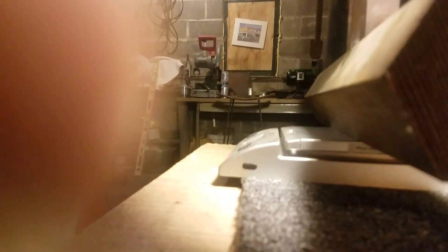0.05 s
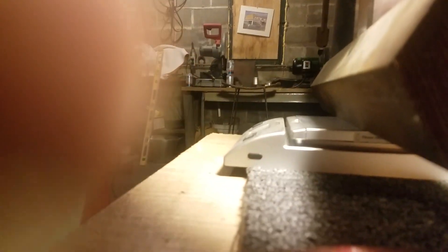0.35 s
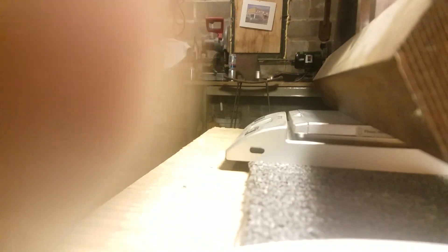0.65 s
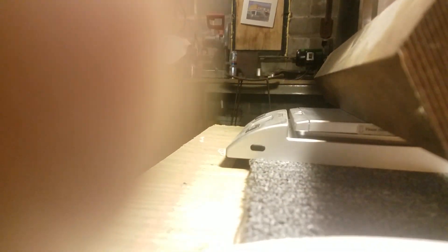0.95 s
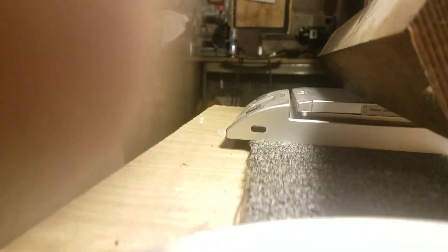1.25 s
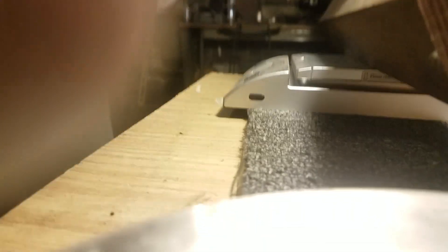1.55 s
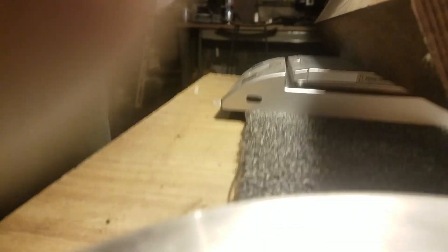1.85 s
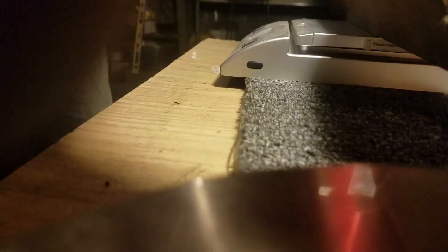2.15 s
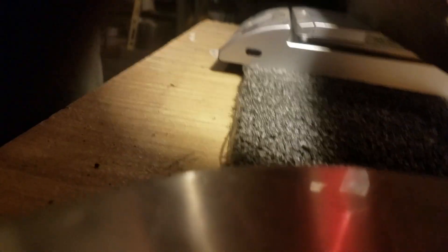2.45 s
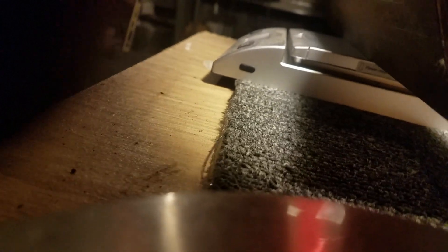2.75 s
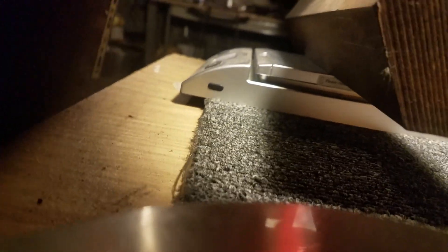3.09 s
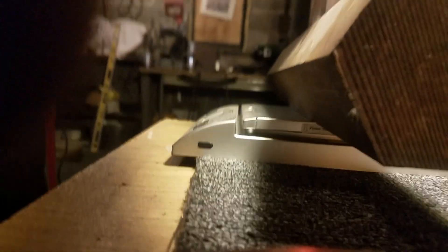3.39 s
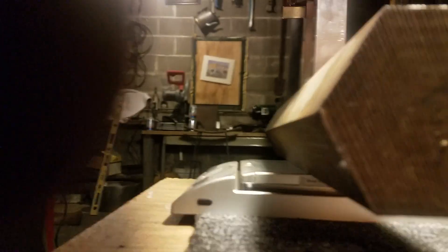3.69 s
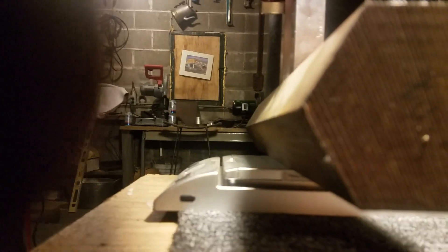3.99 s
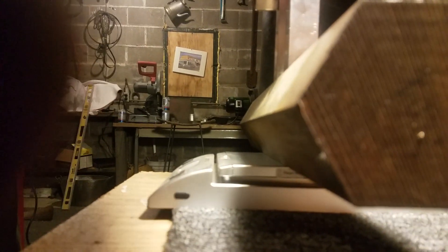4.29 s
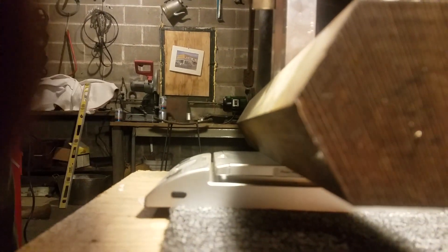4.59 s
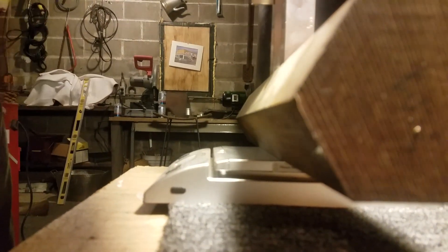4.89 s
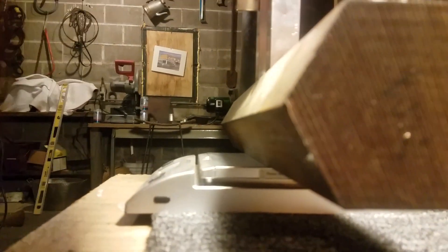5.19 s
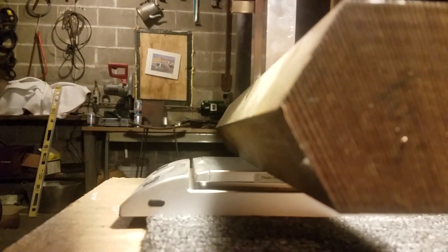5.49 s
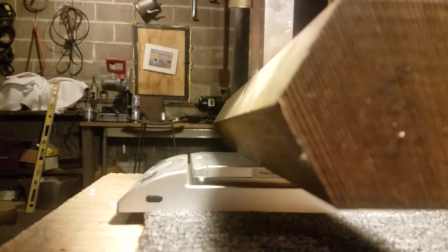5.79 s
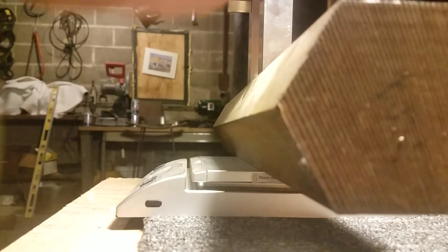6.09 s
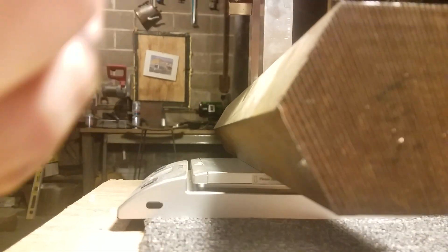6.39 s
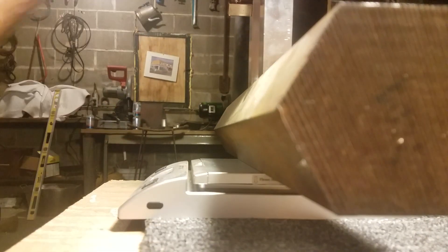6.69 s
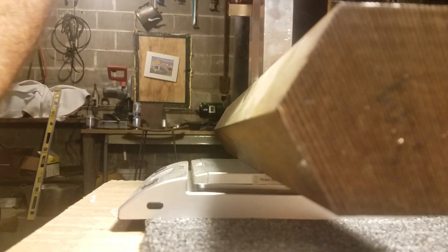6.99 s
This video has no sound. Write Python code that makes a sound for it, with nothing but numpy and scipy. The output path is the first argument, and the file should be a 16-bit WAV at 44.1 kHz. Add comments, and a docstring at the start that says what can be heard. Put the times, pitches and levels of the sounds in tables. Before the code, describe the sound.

A phone is handled in a quiet workshop, heard right at its own microphones, clear on the left and dull on the right. Light fingertip rubbing and a low, lumpy rumble run from the start, with small knocks around 0.6 and 1.1 seconds. From 1.3 to 2.2 seconds the gripping skin creaks and gives sharp ticks, followed by soft thumps. Short wavering squeaks come at about 2.4, 2.7 and 3.2 seconds. Heavier scraping with clicks and bumps fills 3.4 to 4.2 seconds. At about 4.8 seconds the case lands on a workbench in a quick cluster of knocks, the loudest moment, and the bench rings briefly. A lull with faint taps follows. From 5.6 seconds fingers brush the phone again, with a sharp click at 6 seconds and light taps until the end at about 7. Still air and a faint low drone lie underneath.

```python
"""A quiet workshop, heard through a phone's own two microphones as it is handled and propped on a bench.
A fingertip rubs right beside the left port; where the skin grips it sticks and slips, in ticks,
creaks and short squeaks. The grip flexes the case with a low rumble. The case knocks on the bench,
which rings, and the fingers brush it again. The right microphone hears the handling dully, through
the body. Behind it all lie still air and a faint low drone."""
import sys
import numpy as np
from scipy import signal
from scipy.fft import rfft, irfft, next_fast_len
from scipy.io import wavfile

SR = 44100
rng = np.random.default_rng(int(sys.argv[2]) if len(sys.argv) > 2 else 0)


def to_wav(s):
    """Save 16-bit WAV."""
    ch = np.atleast_2d(s).T  # columns
    pcm = np.round(np.clip(ch, -1, 1) * 32767)  # PCM
    wavfile.write(sys.argv[1], SR, pcm.astype(np.int16))


N = 310905

# What a slip rings with at the near (left) port and, through the body, at the far (right) one.
# Each row: nominal frequency in Hz, width in Hz, relative level in dB.
NEAR_MODES = [(750, 650, -11.5), (1540, 380, 0), (2380, 876, 0), (3300, 502, 2.5), (4080, 550, -0.5),
              (6510, 960, -3.5), (7640, 2300, -6.5), (11610, 940, -8.5), (15000, 2600, -8)]
FAR_MODES = [(680, 770, 15), (1600, 94, -2.5), (2130, 510, -10.5), (4250, 2900, 4)]
# How firmly the hand holds the case, slackest just after it lands on the bench.
# Each row: time in seconds, then skin creep, left rumble and right rumble in dB.
GRIP = [(0, -58.5, -59, -65), (.47, -68, -57, -64), (.6, -61, -48, -65), (1.0, -62.5, -53.5, -61),
        (1.15, -59, -42.5, -59), (1.48, -59, -49, -61.5), (2.03, -48, -48, -66), (2.14, -62, -53, -61),
        (2.6, -56.5, -47, -65), (3.02, -62.5, -52.5, -59), (3.38, -62, -51, -66.5),
        (3.52, -49.5, -43.5, -49.5), (3.97, -62, -52, -60.5), (4.32, -63.5, -56.5, -61),
        (4.7, -68, -62, -64.5), (4.85, -54, -52.5, -54.5), (5.17, -72, -74, -83), (5.57, -69.5, -64, -71.5),
        (5.76, -68, -56.5, -57.5), (6.1, -57, -50.5, -62), (6.52, -59.5, -63.5, -66), (7.05, -53, -53, -57)]


def from_db(db):
    """Decibels to gain."""
    return 10 ** (np.asarray(db) / 20)


def rms_one(x):
    """Scale to an rms of 1."""
    return x / np.sqrt(np.mean(x ** 2) + 1e-20)


def in_time(rows):
    """Each column of a curve at every sample."""
    s, *columns = np.transpose(sorted(rows))
    return [np.interp(np.arange(N) / SR, s, c) for c in columns]


def add(track, s, sound):
    """Mix a sound in at s seconds."""
    at = int(round(s * SR))
    track[at:at + len(sound)] += sound[:N - at]


def drift(hz):
    """Slow random wander of spread 1."""
    r = np.exp(-2 * np.pi * hz / SR)
    return rms_one(signal.lfilter([1], [1, -2 * r, r * r], rng.standard_normal(N + SR))[SR:])


def coloured(x, colour):
    """Give a steady excitation a spectrum that falls away beyond its end points; rms 1."""
    hz, db = np.transpose(colour)
    size = next_fast_len(N)
    log_hz = np.log(np.maximum(np.fft.rfftfreq(size, 1 / SR), 1))
    beyond = np.abs(log_hz - np.clip(log_hz, np.log(hz[0]), np.log(hz[-1])))
    gain = from_db(np.interp(log_hz, np.log(hz), db) - 30 * beyond)
    return rms_one(irfft(rfft(x, size) * gain, size)[:N])


def resonate(x, hz, width_hz):
    """A resonance with gain 1 at its peak."""
    r = np.exp(-np.pi * width_hz / SR)
    poles = [1, -2 * r * np.cos(2 * np.pi * hz / SR), r * r]
    return signal.lfilter(np.array([1, 0, -1]) * (1 - r * r) / 2, poles, x)


def gesture(s, length, attack_s, release_s, swell_db=0.0, arch_db=0.0):
    """Rise, hold with a swell and an arch, then die away; gain at every sample."""
    out = np.zeros(N)
    t = np.arange(int((length + 8 * release_s) * SR)) / SR
    along = np.minimum(t / length, 1) - .5
    hold = from_db(swell_db * along + arch_db * (np.cos(np.pi * along) - 2 / np.pi))
    add(out, s, hold * np.minimum(t / attack_s, 1) * np.exp(-np.maximum(t - length, 0) / release_s))
    return out


def room_tone(air_db=-69.5, drone_db=-72.5):
    """Still air, separate at each microphone, and a faint low drone common to both."""
    # Spectrum of the air. Each row: frequency in Hz, relative level in dB.
    air_colour = [(15, -20.5), (25, 0), (92, 0.5), (190, -8.5), (309, -5.5), (591, -31), (863, -24.5),
                  (1040, -30.5), (1290, -22), (2220, -19.5), (5880, -31.5), (14800, -30.5), (16000, -41.5)]
    air = np.array([coloured(rng.standard_normal(N), air_colour) for side in range(2)])
    drone = rms_one(resonate(rng.standard_normal(N), hz=312, width_hz=24))
    return from_db(air_db) * air + from_db(drone_db) * drone


def workshop_tail(x, t60=0.27, wet_db=-50.0, wall_hz=3500):
    """The room returns a faint dull tail."""
    t = np.arange(SR // 2) / SR
    walls = signal.butter(2, wall_hz, fs=SR, output="sos")
    tails = signal.sosfilt(walls, rng.standard_normal((2, len(t)))) * from_db(-60 * t / t60)
    tails /= np.sqrt(np.sum(tails ** 2, axis=1, keepdims=True))
    return from_db(wet_db) * signal.fftconvolve(x.sum(axis=0)[None], tails, axes=1)[:, :N]


def grip_rumble(opposed=0.043, lumps_db=3.5):
    """The grip flexes the case in lumps, pushing the two microphones partly in opposite senses."""
    # Shifts of the grip. Each row: start and length in seconds, left and right level in dB.
    bumps = [(0.077, 0.016, -45.5, -55), (0.227, 0.027, -47.5, -60), (0.3, 0.019, -54, -49.5),
             (.58, 0.011, -43.5, -56), (0.775, .025, -43, -62), (.945, 0.018, -39, -65),
             (1.964, 0.029, -36.5, -62), (2.198, .035, -34.5, -41), (3.438, .035, -43, -57),
             (3.532, 0.023, -41, -40), (3.929, .02, -45, -48), (4.148, 0.017, -45, -42),
             (4.764, 0.045, -34, -34.5), (4.93, 0.018, -51, -49), (5.044, 0.011, -48, -56),
             (5.236, 0.015, -54.5, -76), (5.666, 0.014, -39, -43), (5.843, 0.028, -43, -46.5),
             (5.986, 0.024, -38.5, -46), (6.166, 0.021, -39.5, -49), (6.226, .015, -50, -53),
             (6.571, 0.02, -43, -52), (6.815, 0.062, -46, -52)]
    # Spectrum of the flexing case. Each row: frequency in Hz, relative level in dB.
    rumble_colour = [(20, -11), (50, 0), (110, -1.5), (200, -6.5), (330, -16), (600, -25)]
    flex = from_db(in_time(GRIP)[1:]) * from_db(lumps_db * drift(hz=7.1))
    for s, length, *sides_db in bumps:
        bump = gesture(s, length, attack_s=0.0042, release_s=0.015)   # gives at once, then settles
        flex = np.maximum(flex, np.outer(from_db(sides_db), bump))
    left, right = (coloured(rng.standard_normal(N), rumble_colour) for side in range(2))
    return flex * np.array([left, rms_one(right - opposed * left)])


def friction(per_s, spread_db, smooth):
    """Skin ridges catch at random, with uneven force, over a smooth sliding hiss."""
    caught = rng.random(N) < per_s / SR
    force = from_db(spread_db * np.minimum(rng.exponential(1, N), 4)) * rng.choice([-1, 1], N)
    return rms_one(rms_one(caught * force) + smooth * rng.standard_normal(N))


def stroke_gains(lead_s=0.0053):
    """Gains of rub, bright rub, scuff, hiss and far port: strokes over the holding hand's faint creep."""
    # Strokes of skin past the port. Each row: start and length in seconds, then in dB the rub level,
    # its swell from start to end, brightness, scuff and hiss relative to the rub, and far port level.
    strokes = [(0.087, 0.011, -71, -3, 4, 2, -10, -52.5), (0.231, 0.011, -35, -4, 4.5, 0, -2.5, -68),
               (0.309, 0.013, -60.5, 1, 11, -1, -6, -48), (0.339, 0.11, -55, 1.5, 6, 0, -3, -68),
               (0.488, 0.053, -50, -10.5, 1, 1, -4.5, -73),
               (0.576, 0.066, -50.5, -19, 4.5, -4.5, -5.5, -67),
               (0.645, 0.074, -48.5, -5, 4.5, -7.5, -2.5, -70),
               (0.739, 0.056, -53.5, 11.5, 4.5, 0, -2, -68), (0.925, 0.027, -48.5, 16, 2.5, 1.5, -4, -66),
               (1.051, 0.08, -59, 0, -8, 8.5, -8, -72), (1.143, 0.077, -46, 3.5, 3.5, 0.5, -3.5, -67),
               (1.242, 0.11, -48, 4, -3.5, -3.5, -10, -57), (1.508, 0.18, -60.5, -5, 1, 7.5, -1.5, -71),
               (1.685, 0.16, -48, 5, 3, 0, -3.5, -62), (1.914, 0.092, -50.5, 15, 3, -2, -3.5, -78),
               (2.046, 0.061, -49.5, -5, -5, 2, -7, -62), (2.195, 0.083, -41, -8.5, 7, 1, -4.5, -42.5),
               (2.372, 0.23, -43, 4, 7, -6.5, -8, -52.5), (2.662, 0.15, -42, -4, 0, -8, -9, -54),
               (2.821, 0.084, -56, -4, -21, 5.5, 0, -54.5), (3.166, 0.15, -44, -13, 2, -11.5, -11.5, -60),
               (3.418, 0.13, -39, -15, 3.5, -2.5, -6.5, -45), (3.601, 0.17, -38.5, 2, 0, -2.5, -10.5, -47),
               (3.799, 0.14, -40.5, -2.5, 0, -7, -14.5, -53),
               (3.981, 0.188, -46.5, 0.5, 0.5, -0.5, -8, -61),
               (4.358, 0.043, -44, 2.5, 0.5, -0.5, -9.5, -66), (4.422, 0.086, -58.5, -4, 2, 2.5, -6, -55.5),
               (4.61, 0.064, -57, -4, 3, 5, -15, -60.5), (4.744, 0.044, -39, 5, 2, -1, -9, -40),
               (4.851, 0.11, -54, -16, 7, 3, -8, -57.5), (4.983, 0.153, -55.5, 4.5, 3, -7, -5, -74),
               (5.615, 0.033, -48, -1.5, 2.5, -3, -8, -74), (5.67, 0.097, -60, -8, 7, 0, -1.5, -66),
               (5.848, 0.075, -55, -10, 3, 3, -5.5, -65), (5.903, 0.11, -42.5, 4, 2, -2.5, -1, -58),
               (6.023, 0.16, -47.5, -5.5, -1.5, -5, -4, -65),
               (6.31, 0.17, -45.5, -9.5, -0.5, -1.5, -11, -73), (6.428, 0.042, -41, 9, -7, -3.5, -18, -71),
               (6.496, 0.026, -56.5, 4, 4, 1, -1, -74), (6.559, 0.039, -48, -11, 5.5, 0, -9.5, -65),
               (6.634, 0.085, -46, -8, 3.5, 0.5, -12.5, -64), (6.726, 0.075, -46, 3, 4, -0.5, -9.5, -67),
               (6.837, 0.031, -48.5, 2, 6.5, -2, -3.5, -62), (6.928, 0.093, -53, 6.5, 6, -1, -2.5, -72)]
    creep = from_db(in_time(GRIP)[0])
    power = np.outer(from_db([0, 0, 0, -4.5, -5]), creep) ** 2
    for s, length, db, swell_db, bright_db, scuff_db, hiss_db, far_db in strokes:
        # The skin gives just before it slides; the arch is the extra speed in mid-stroke.
        stroke = gesture(s - lead_s, length + lead_s, attack_s=0.0089, release_s=0.0084,
                         swell_db=swell_db, arch_db=0.5)
        on = np.flatnonzero(stroke)
        gains = from_db([db, db + bright_db, db + scuff_db, db + hiss_db, far_db])
        power[:, on] += np.outer(gains, stroke[on]) ** 2
    return np.sqrt(power)


def rubbing(rub_db=-0.5, scuff_db=-1.5, hiss_db=0.5, flutter_db=2.5, bright_above_hz=2620):
    """Sliding skin gives the near port a mid-range rub, a low scuff and a hiss; the far one hears it dully."""
    # Spectra of these four sounds. Each row: frequency in Hz, relative level in dB.
    rub_colour = [(700, -20), (1300, 3), (1900, 3.5), (3000, -3), (4500, -12.5), (6500, -24.5)]
    scuff_colour = [(150, -7), (300, 0), (500, -3.5), (850, 0), (1300, -10), (2000, -10)]
    hiss_colour = [(3500, -1), (6000, 0), (7500, -4), (9200, -8.5), (12000, -3), (15500, -4)]
    far_colour = [(150, 3), (300, 2), (600, -2), (1200, -8), (2200, -9.5), (3000, -15.5), (4500, -15.5),
                  (7000, -30.5), (15000, -22.5)]
    rub, bright, scuff, hiss, far = stroke_gains()
    mid = coloured(friction(per_s=3000, spread_db=1.5, smooth=1.0), rub_colour)
    dull = signal.sosfiltfilt(signal.butter(4, bright_above_hz, fs=SR, output="sos"), mid)
    near = from_db(rub_db) * (rub * dull + bright * (mid - dull))   # drier skin lifts the top
    near += hiss * from_db(hiss_db) * coloured(rng.standard_normal(N), hiss_colour)
    low = coloured(friction(per_s=1900, spread_db=2.5, smooth=0.82), scuff_colour)
    near += scuff * from_db(scuff_db) * low
    through_body = coloured(friction(per_s=3500, spread_db=5.5, smooth=1.1), far_colour)
    return np.array([from_db(flutter_db * drift(hz=46)) * near, far * through_body])


def slides(far_db=-21.5):
    """Too fast to stick, the skin drives one broad resonance for a moment and half sings."""
    # Each row: start and length in seconds, rms level at the near port in dB, pitch and width in Hz.
    quick_slides = [(0.891, .012, -51.5, 2360, 600), (1.028, 0.022, -46, 1590, 500),
                    (1.101, 0.029, -42, 1580, 546), (1.13, 0.019, -52, 1480, 700),
                    (1.245, 0.022, -41.5, 1650, 450), (1.312, 0.032, -33, 2580, 900),
                    (1.424, 0.036, -44.5, 1770, 400), (1.516, 0.02, -49, 1600, 500),
                    (1.55, .02, -40, 1890, 608), (2.442, 0.15, -41, 3400, 800),
                    (2.741, 0.043, -42.5, 3028, 796), (2.889, 0.011, -38, 1626, 786),
                    (2.914, 0.0088, -46, 1720, 700), (2.966, 0.013, -47.5, 1602, 802),
                    (3.049, 0.0093, -47.5, 1620, 796), (3.067, 0.012, -49, 1620, 800),
                    (3.224, 0.11, -50, 2940, 696.4), (3.834, .11, -47.5, 1600, 599.6),
                    (5.909, 0.23, -44, 14000, 2500), (6.002, 0.017, -42, 1340, 700),
                    (6.453, 0.024, -47, 1690, 900), (6.65, 0.026, -46.5, 2000, 1800),
                    (6.762, 0.037, -48, 3450, 1700)]
    out = np.zeros(N)
    grains = friction(per_s=3700, spread_db=10.5, smooth=1.0)
    for s, length, db, hz, width in quick_slides:
        voiced = resonate(grains[int(s * SR):][:int(length * SR)], hz, width)
        if hz > 2 * width:
            voiced = resonate(voiced, hz, 2 * width)   # steeper skirts
        add(out, s, from_db(db) * rms_one(voiced * signal.windows.tukey(len(voiced), .5)))
    return out * from_db([[0], [far_db]])


def slip_pulse(modes, tilt_db=0.0, shift=0.942):
    """One slip heard through the modes, which change a little with the place of the finger; peak 1."""
    click, pulse = signal.unit_impulse(512), 0
    for k, (hz, width, db) in enumerate(modes):
        stray_db, detune = rng.normal(0, [1.0, .025])
        gain = (-1) ** k * from_db(db + stray_db + tilt_db * np.log2(hz))
        pulse += gain * resonate(click, hz * shift * np.exp(detune), width)
    return pulse / np.abs(pulse).max()


def slip_train(curve, jitter=0.022, uneven_db=1.63, limp=0.18, soft_hz=1800):
    """Skin loads and lets go at the slip rate, strong and weak in turn; quick slips are rounder."""
    s, rate, db = np.transpose(sorted(curve))
    train = np.zeros(int((s[-1] - s[0]) * SR) + 64)
    rounded, sharp = np.hanning(9) / 2, signal.unit_impulse(9, "mid")
    t, sign = s[0], 1
    while t <= s[-1]:
        per_s = np.interp(t, s, rate)
        force = from_db(np.interp(t, s, db) + uneven_db * rng.normal()) * (1 + sign * limp)
        soft = per_s ** 4 / (per_s ** 4 + soft_hz ** 4)
        add(train, t - s[0], force * (soft * rounded + (1 - soft) * sharp))
        t += np.exp(jitter * rng.normal()) / per_s
        sign = -sign
    return train


def case_ring(contacts, ring_db=-16.0, rattle_t60=0.013, rattle_db=-15.5):
    """After each contact the case hums on one mode and a dense, short rattle dies away."""
    t = np.arange(SR // 10) / SR
    rattle = resonate(rng.standard_normal(len(t)), hz=2100, width_hz=1600) * from_db(-60 * t / rattle_t60)
    rattle *= from_db(rattle_db) / np.sqrt(np.sum(rattle ** 2))
    hum = from_db(ring_db) * resonate(contacts, hz=900, width_hz=45)
    return hum + signal.fftconvolve(contacts, rattle[None], axes=1)[:, :N]


def case_swing(hz, firm, damping=0.79, round_off=3.14):
    """The push and rebound of a soft contact; peak 1."""
    soft = signal.butter(2, round_off * hz, fs=SR, output="sos")
    pulse = signal.sosfilt(soft, resonate(signal.unit_impulse(SR // 20), hz, firm * damping * hz))
    return pulse / np.abs(pulse).max()


def knocks(far_pitch=0.63, crack_db=-18.5, firm_share=0.13):
    """A blow gives the case one damped swing, opposite at its two ends, and sets the bench ringing."""
    # Knocks and finger thumps on the case. Each row: start in seconds, peak in dB, pitch in Hz,
    # then right microphone and bench ring in dB relative to that peak.
    hits = [(.5840, -20, 1240, -22, -51), (.9520, -25.5, 400, -23, -50), (1.109, -23, 1100, -15, -47),
            (1.148, -27, 745, -20, -50), (1.1711, -23, 914, -27, -48), (2.1070, -21, 177, -37, -50),
            (2.2110, -22.5, 493, -17, -43), (2.2165, -17.5, 142, -18, -30), (2.2250, -20, 108, -13, -49),
            (2.2665, -19.5, 178.9, -33, -44), (3.4420, -21, 264.5, -5, -38), (3.4480, -18.5, 170, -25, -42),
            (3.5500, -22.5, 456.4, -4, -48), (3.9216, -20.5, 625, -5.5, -31),
            (4.1527, -10.5, 730, -1, -33.5), (4.7314, 0, 567, -35, -52), (4.7629, 4.5, 647, -10.5, -49),
            (4.7680, -16, 87, -12, -45.5), (4.7896, -7, 737, -5.5, -20.5),
            (4.9372, -14.5, 690, -5.5, -37.5), (5.2463, -31.5, 848, -18.5, -33.5),
            (5.2890, -36.5, 927, -7.5, -34), (5.4800, -32.5, 700, -21, -26), (5.6500, -35, 1050, -31, -47),
            (5.6713, -23.5, 650, -14.5, -42), (5.8500, -29.5, 790, -11, -39), (6.1737, -26, 650, -16, -50),
            (6.221, -38, 696, -15, -45), (6.58, -33, 790, -16, -41), (6.815, -31, 746, -14, -45),
            (6.896, -37, 696, -14, -45)]
    # The bench under the case. Each row: frequency in Hz, relative level in dB, t60 in seconds.
    bench_modes = [(431, -14, .22), (497, -3.5, 0.22), (760, -9, 0.24), (1254, -23.5, .12),
                   (1670, -13.5, 0.06)]
    out, blows = np.zeros((2, N)), np.zeros(N)
    for s, db, hz, right_db, ring_db in hits:
        firm = from_db(firm_share * db)   # a light touch damps the case less and hardly cracks
        add(out[0], s, from_db(db) * case_swing(hz, firm))
        add(out[1], s, -from_db(db + right_db) * case_swing(far_pitch * hz, firm))
        hardness = firm * min(hz / 800, 1) ** 2   # only hard contacts crack
        add(out[0], s, from_db(db + crack_db) * hardness * slip_pulse(NEAR_MODES))
        add(out[1], s, from_db(db + right_db + crack_db) * hardness * slip_pulse(FAR_MODES))
        add(blows, s, from_db([db + ring_db]))
    t = np.arange(SR // 2) / SR
    ring = sum(from_db(db - 60 * t / t60) * np.sin(2 * np.pi * hz * t) for hz, db, t60 in bench_modes)
    return out + signal.fftconvolve(blows, ring)[:N] * from_db([[0.0], [-2.0]])


def creaks_and_ticks(far_db=-18.5):
    """Gripping skin lets go: a handful of slips is a creak, a single one a tick."""
    # Each row: start and length in seconds, first and last slips per second,
    # first and last level in dB, tilt in dB per octave.
    creaks = [(1.316, 0.0046, 1230, 2400, -10.5, -17.5, -0.5), (1.3452, .0026, 1130, 1230, -30, -1, -1),
              (1.5434, 0.0038, 420, 900, -9.5, -3.5, -1.5), (1.546, 0.0053, 1700, 1100, -14.5, -22, 0),
              (1.564, 0.0071, 1600, 630, -14, -13.5, -1.5), (1.8148, .0019, 730, 650, -12.5, -1, -1),
              (1.8535, 0.011, 500, 820, -9, -9, 1), (1.8636, .0092, 830, 420, -11.5, -10, 1.5),
              (2.5977, 0.0061, 1400, 380, -22, -3.5, -1), (2.801, 0.012, 1320, 274, -14, -11, 1.5),
              (3.3126, 0.0037, 1130, 350, -12.5, -18.5, -3), (3.4191, 0.0056, 480, 975, -8, -9, -1.5),
              (3.547, 0.0019, 530, 350, -14, -9, -10.5), (3.6645, 0.0061, 515, 1690, -6, -11.5, -3),
              (3.7285, 0.0023, 450, 390, -12, -10, -4), (3.7671, 0.0017, 830, 570, -5.5, -31, -2),
              (4.7529, 0.0012, 760, 1000, -5, -22, -3.5)]
    # Each row: start in seconds, peak at the near port in dB, tilt in dB per octave.
    ticks = [(0.0336, -32, -2.5), (1.067, -31.5, -1), (1.1146, -32.5, 2), (1.2069, -16.5, -6),
             (1.419, -28.5, -6), (1.739, -27, -6), (1.756, -28.5, -9), (1.7796, -10.5, -2),
             (1.7818, -2, -1.5), (1.7837, -22, -13), (1.826, -31, -1), (2.0474, -4, 0), (2.0620, -8, 0.5),
             (2.095, -24.5, 1.5), (2.1622, -27.5, -3), (2.2010, -16.5, -2.5), (2.3602, -20, -8.5),
             (3.4061, -16.5, -12), (3.6163, -13, 6), (3.618, -4.5, -2.5), (3.7927, -2, -4),
             (3.7968, -13, -5.5), (3.9374, -11, -5), (4.0259, -6, -4), (4.029, -19, 0),
             (4.0292, -13.5, -6.5), (4.4226, -24, -10), (4.7600, -14, -7.5), (4.7634, -7.5, -1.5),
             (4.8448, -10.5, -2.5), (5.999, -3, -3), (6.063, -21.5, -12)]
    out = np.zeros((2, N))
    trains = [(s, slip_train([(s, first, first_db), (s + abs(length), last, last_db)]), tilt_db)
              for s, length, first, last, first_db, last_db, tilt_db in creaks]
    trains += [(s, from_db([db]), tilt_db) for s, db, tilt_db in ticks]
    for s, train, tilt_db in trains:
        add(out[0], s, np.convolve(train, slip_pulse(NEAR_MODES, tilt_db)))
        add(out[1], s, from_db(far_db) * np.convolve(train, slip_pulse(FAR_MODES, tilt_db)))
    return out


def squeaks(near_db=-3.0, far_db=-16.5):
    """Long runs of slips merge into a gliding pitch under the resonances of the half-covered port."""
    # Each row: the factor by which the finger shifts the port's resonances, then a curve whose
    # points give time in seconds, slips per second and relative level in dB.
    runs = [ (1.1, [(2.3695, 450, -10), (2.379, 1400, -12), (2.388, 1650, -13), (2.394, 1450, -11),
            (2.399, 1050, -7), (2.407, 690, -6), (2.414, 1200, -6), (2.419, 1900, -26),
            (2.429, 2100, -28)]), (1.1, [(2.429, 2100, -24), (2.434, 1850, -10), (2.441, 1460, -7),
            (2.449, 1560, -6), (2.456, 1420, -5), (2.464, 1650, -7), (2.469, 2200, -11),
            (2.473, 2900, -26)]), (.98, [(2.664, 420, -4), (2.670, 1200, -11), (2.675, 1750, -12),
            (2.683, 950, -9), (2.690, 830, -9), (2.701, 1500, -11), (2.710, 1250, -11), (2.716, 570, -7),
            (2.723, 430, -6), (2.736, 620, -7), (2.743, 1500, -10), (2.748, 2500, -24)]),
            (.93, [(3.1715, 270, -24), (3.182, 350, -17), (3.1845, 380, -7), (3.195, 710, -8),
            (3.204, 880, -10), (3.213, 1150, -12), (3.219, 1700, -19), (3.223, 1900, -30)])]
    # The near port with a pressed fingertip damping its low modes.
    # Each row: nominal frequency in Hz, width in Hz, relative level in dB.
    pressed_modes = [(880, 600, -15), (1524, 1130, -5), (2167, 1360, -2), (3163, 930, -0.5),
                     (3674, 590, -1.5), (5980, 610, -13), (6900, 780, -14.5), (10920, 3000, -14),
                     (14100, 4800, -16.5)]
    out = np.zeros((2, N))
    for shift, curve in runs:
        s = curve[0][0]
        train = slip_train(curve, uneven_db=1.13, limp=0.15, soft_hz=1780)
        add(out[0], s, from_db(near_db) * np.convolve(train, slip_pulse(pressed_modes, shift=shift)))
        add(out[1], s, from_db(far_db) * np.convolve(train, slip_pulse(FAR_MODES, tilt_db=-0.5)))
    return out


def scene():
    """Contacts on the case, right at the microphones, over the still air of the room."""
    contacts = creaks_and_ticks() + knocks()
    squeaking = squeaks()
    background = room_tone()
    ringing = case_ring(contacts) + workshop_tail(contacts + squeaking)
    return background + ringing + contacts + squeaking + slides() + rubbing() + grip_rumble()


def record(dry, ceiling=0.88, cutoff_hz=16100):
    """The phone flattens the highest peaks and cuts the top."""
    low_pass = signal.ellip(10, .1, 80, cutoff_hz, fs=SR, output="sos")
    return signal.sosfilt(low_pass, np.clip(dry, -ceiling, ceiling))


dry = scene()
out = record(dry)
to_wav(out)
```